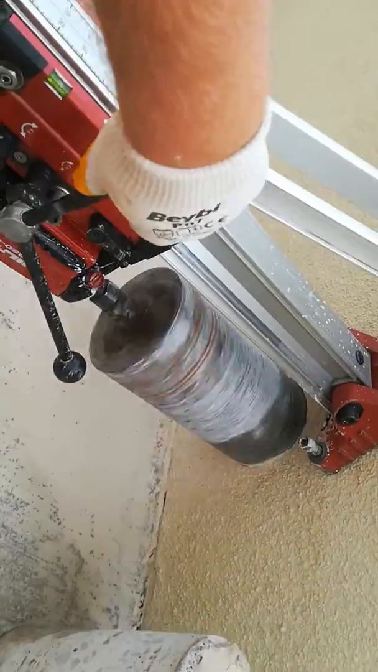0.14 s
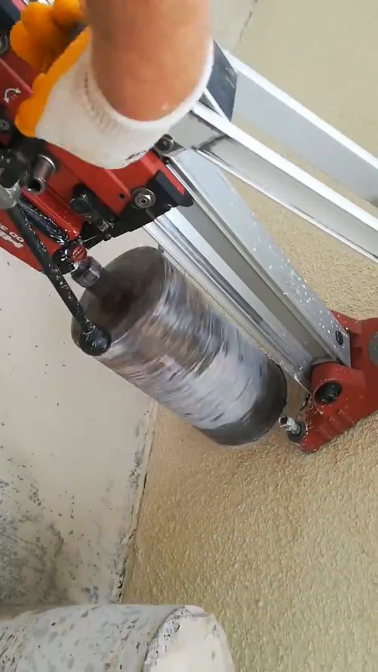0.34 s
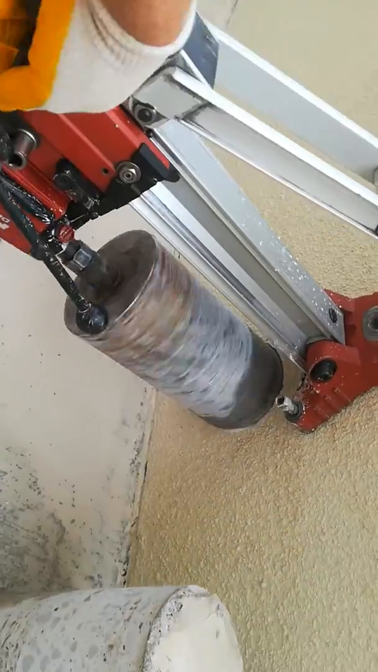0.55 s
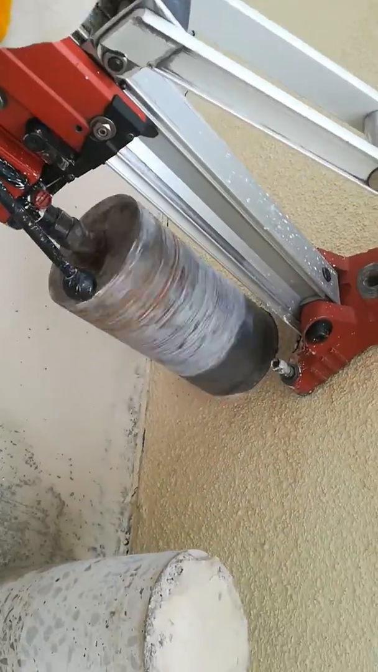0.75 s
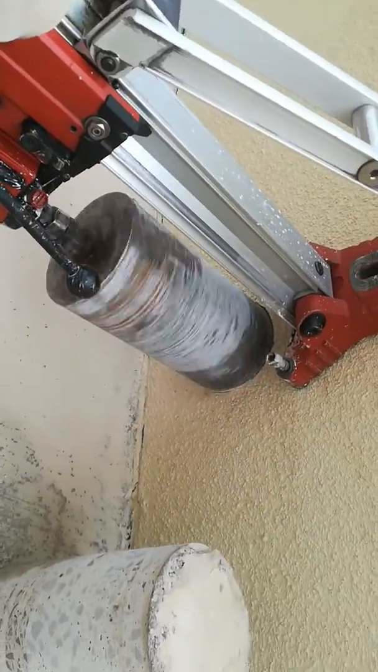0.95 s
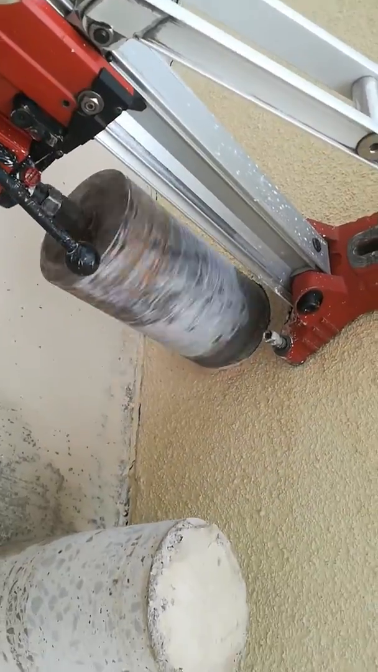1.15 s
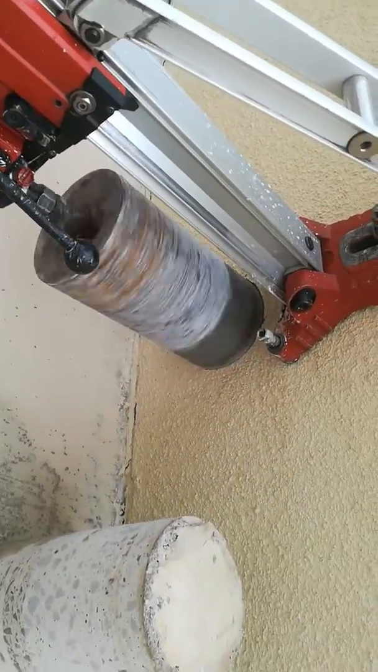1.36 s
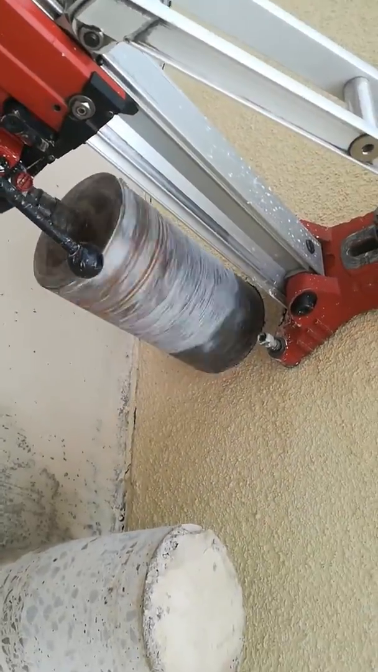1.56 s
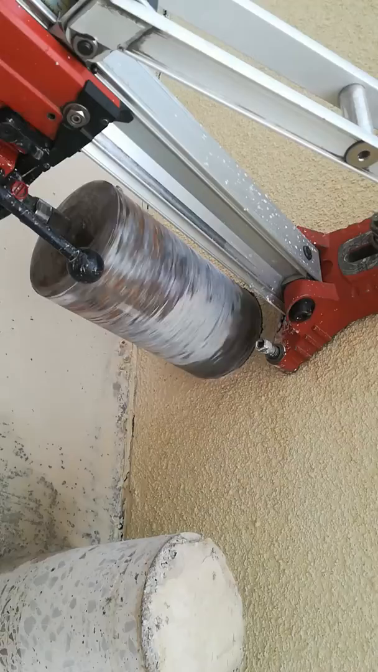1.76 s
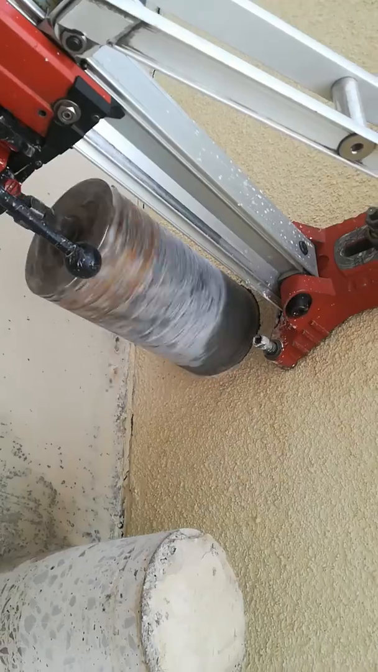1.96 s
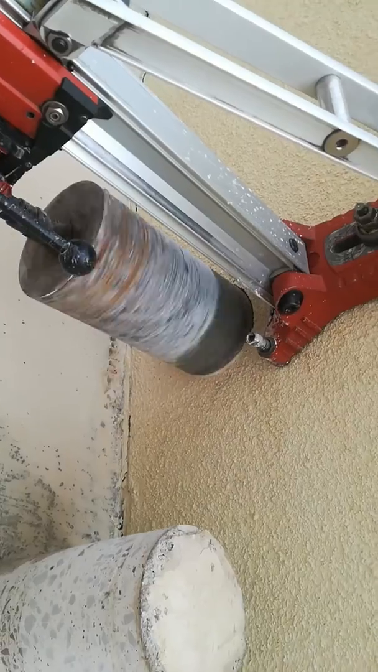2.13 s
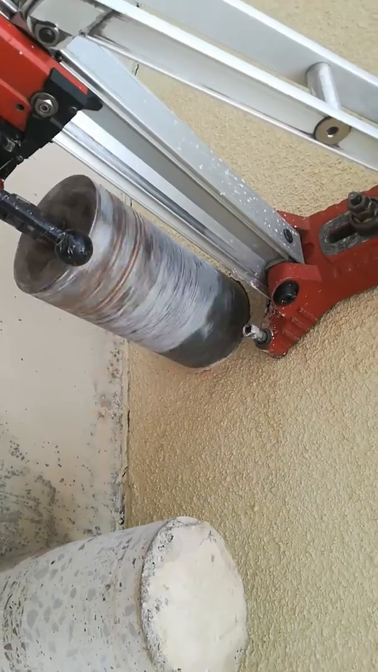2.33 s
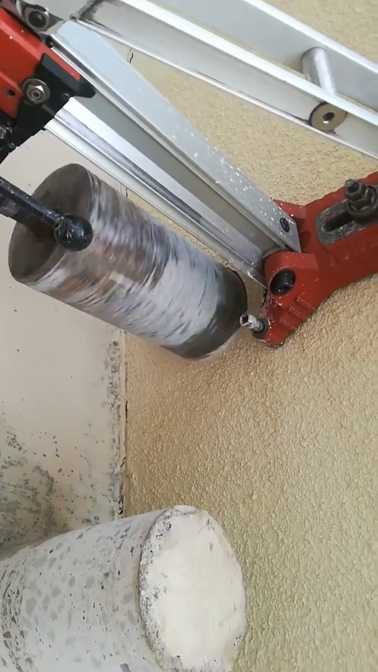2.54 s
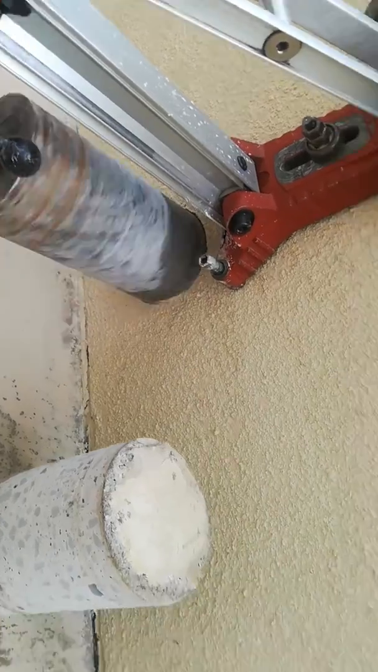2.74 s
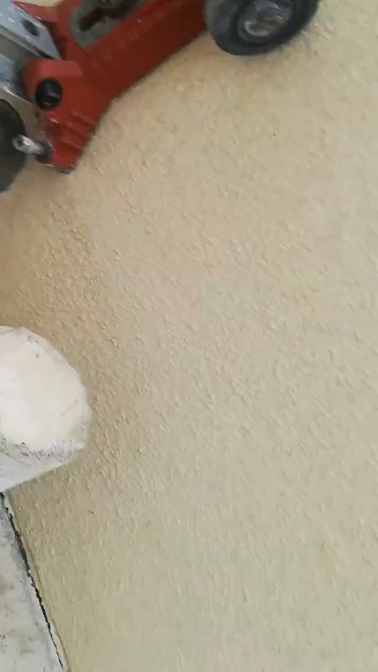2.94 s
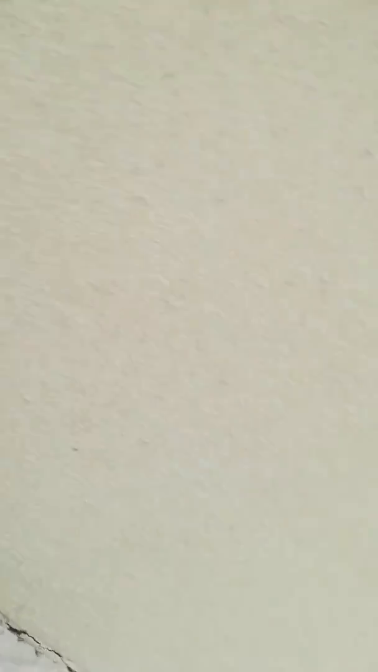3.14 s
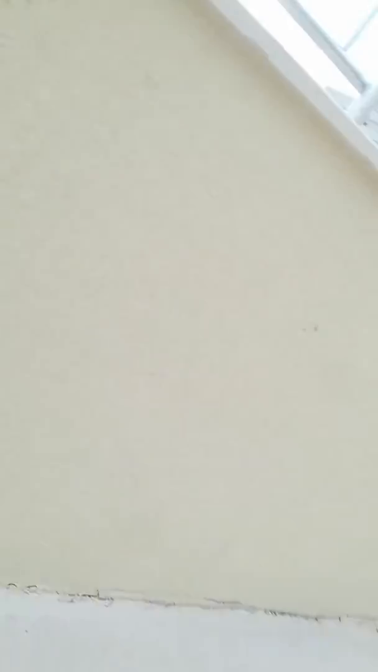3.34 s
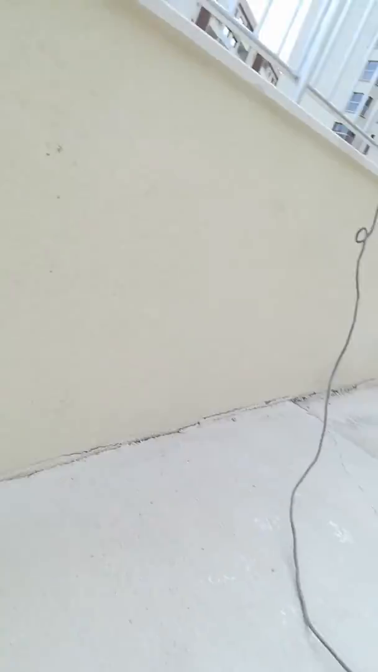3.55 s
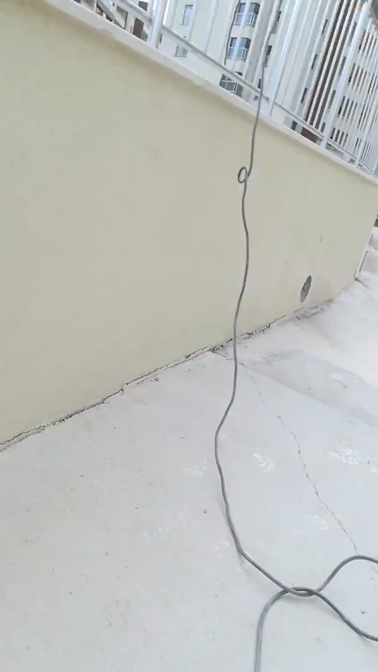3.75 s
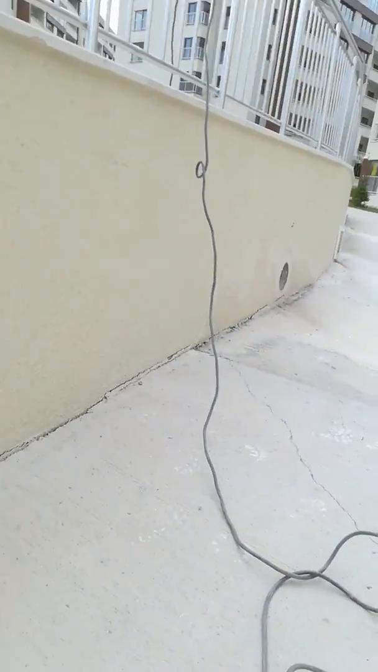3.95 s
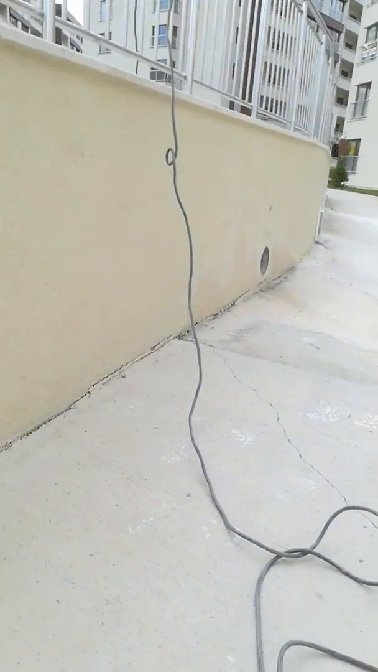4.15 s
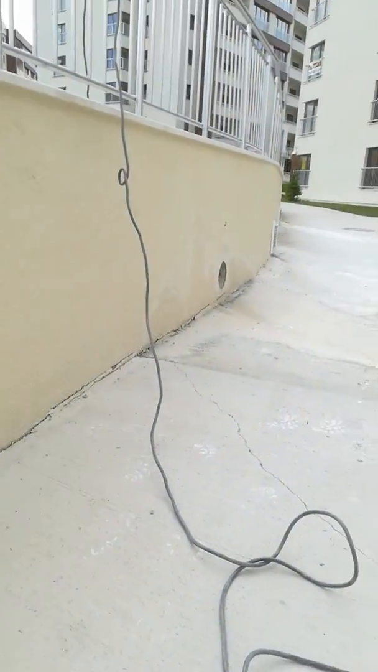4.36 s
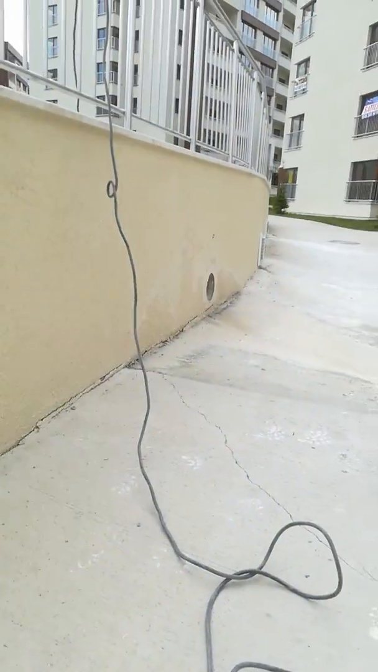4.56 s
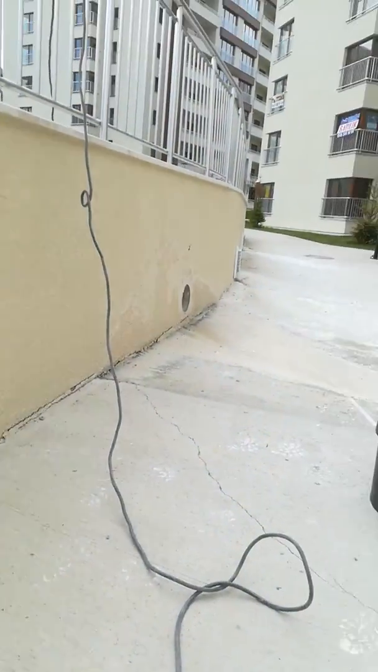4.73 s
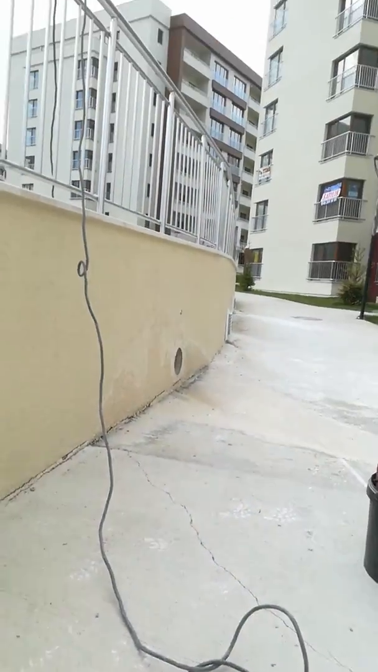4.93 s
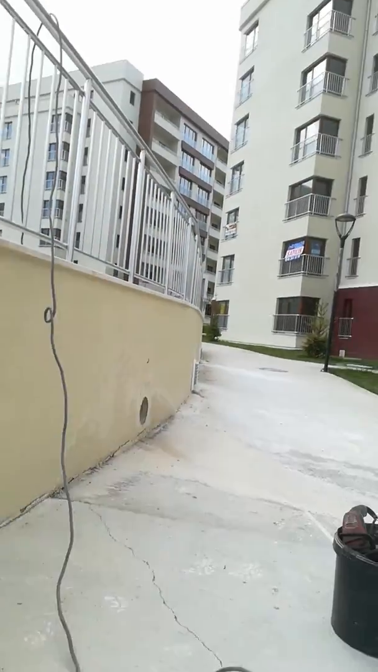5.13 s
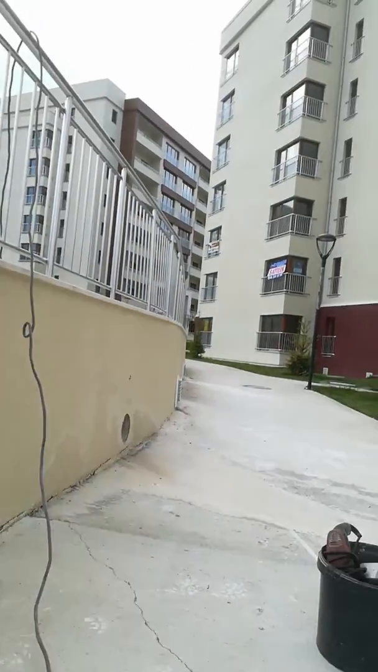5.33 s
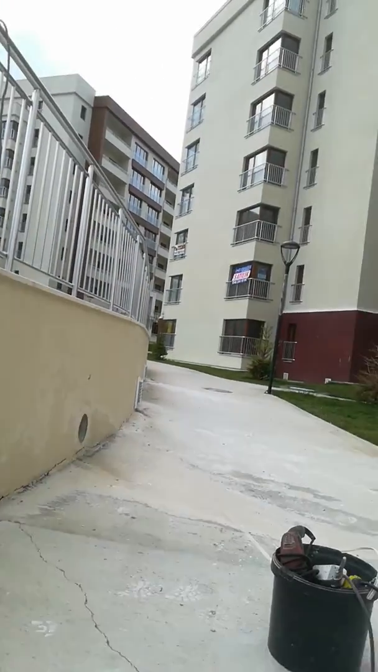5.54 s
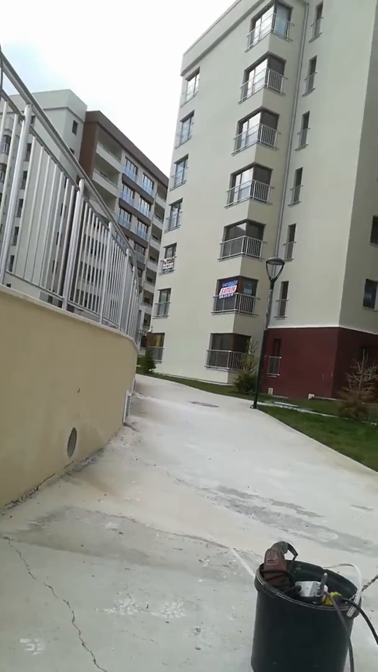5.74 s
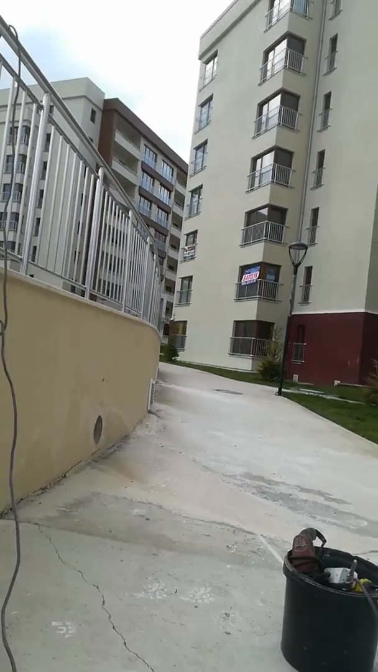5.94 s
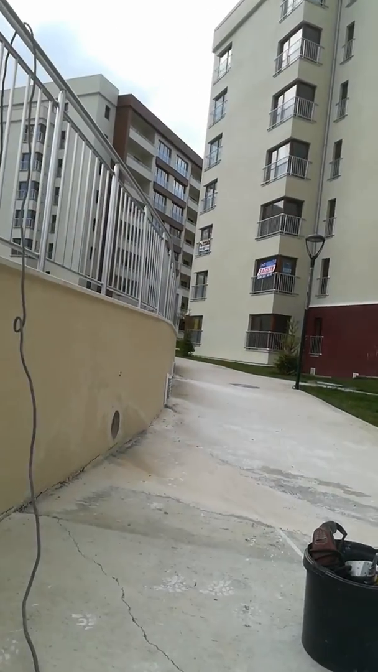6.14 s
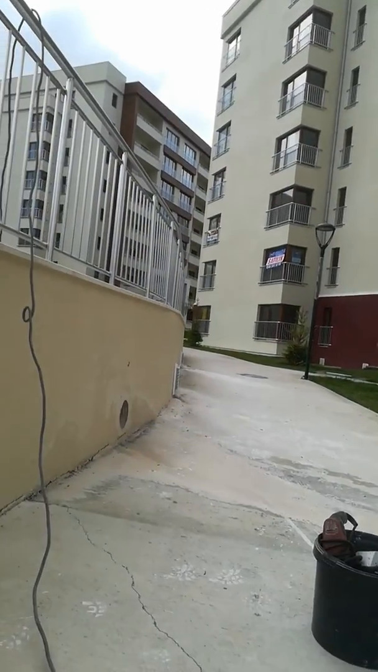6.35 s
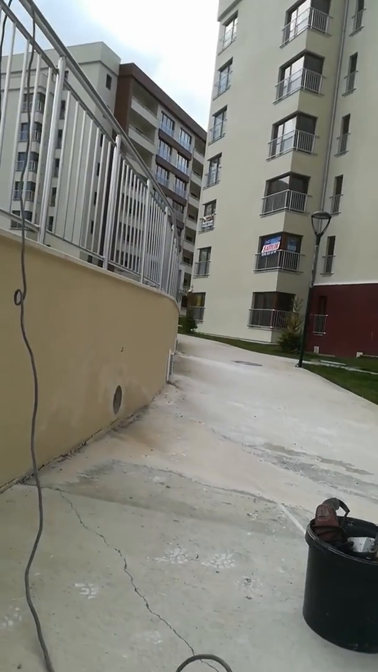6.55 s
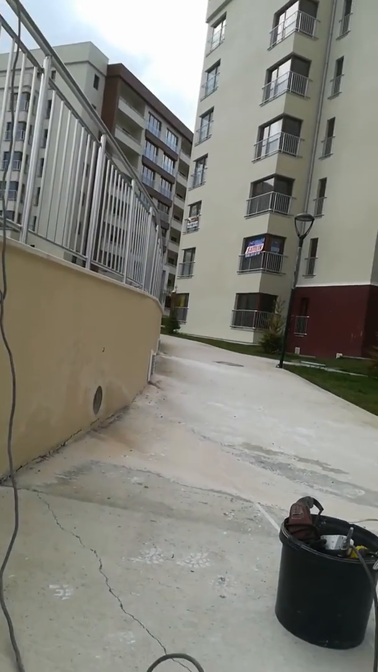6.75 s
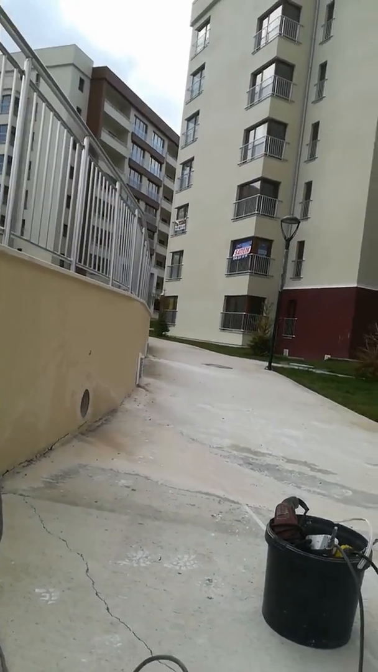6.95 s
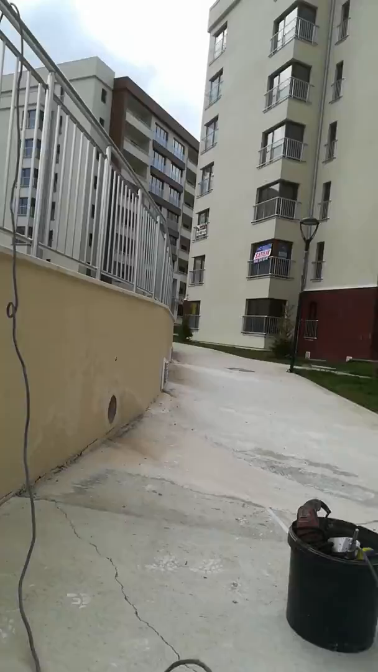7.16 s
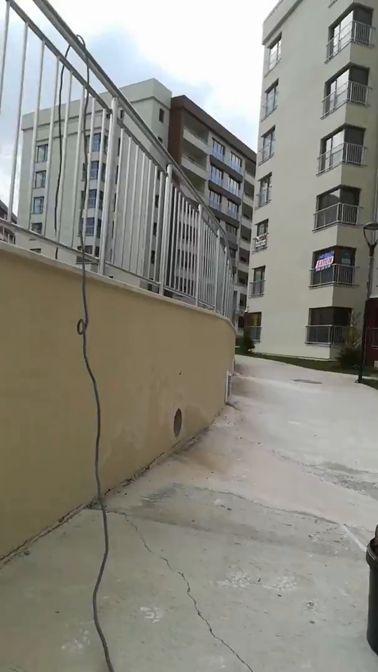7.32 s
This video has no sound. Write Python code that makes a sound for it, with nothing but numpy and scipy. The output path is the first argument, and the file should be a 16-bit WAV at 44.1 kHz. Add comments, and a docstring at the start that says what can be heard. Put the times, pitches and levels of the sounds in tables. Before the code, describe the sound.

A core drill grinds steadily into a concrete wall up close, harsh gritty rasp pulsing about six times a second over a whining motor.

```python
"""An electric core drill on a stand cuts into a concrete wall outdoors, a little over six turns a second.
Noise that repeats with each turn is the diamond grit scraping its groove; friction at tight spots shapes its
force, and resonances of the steel barrel colour it. The motor is a set of sine orders that sag with the load.
Thumps, squeaks, shudder, hum, knocks and gusts lie around it. Two microphones start close, then turn away."""
import sys
import numpy as np
from scipy import signal
from scipy.fft import rfft, irfft, next_fast_len
from scipy.io import wavfile
from scipy.ndimage import map_coordinates

SR = 44100
rng = np.random.default_rng(int(sys.argv[2]) if len(sys.argv) > 2 else 0)


def store_wav(level_fs):
    """Save 16-bit WAV to argv[1]."""
    pcm = np.round(np.clip(np.atleast_2d(level_fs), -1, 1) * 32767)
    wavfile.write(sys.argv[1], SR, pcm.T.astype(np.int16))


N = 330309
TIME = np.arange(N) / SR
SIZE = next_fast_len(N)
HZ = np.fft.rfftfreq(SIZE, 1 / SR)

PINION_TEETH = 7  # the whine is this order of the motor shaft
TURN_AWAY_S, TURN_FADE_S = 3.28, .13  # the microphones swing away from the rig once
AIM_AT_REST = 0.23  # share by which the ports point at the bit before the swing

# resonances of the barrel and stand: (frequency [Hz], width [Hz], lift beside the rig left [dB], right [dB],
# lift turned away left [dB], right [dB])
BARREL_RINGS = [(814, 40, 0.5, 3.5, 7, 9.5), (980, 42, 2.5, 3, -2, -2), (1573, 105, 8, 6, 3, 2.5),
                (1638, 65, 1.5, 10, 4, 3), (2166, 110, 10, 9.5, 7, 3), (2334, 35, 8.5, 6, 7, -2),
                (2730, 110, 1.5, 5.5, 4.5, 6), (3554, 135, 1.5, 1.5, 4.5, 8.5), (3820, 31, 6.5, 2.5, 3, 6),
                (4300, 50, -2.5, -2, 3, 6)]
# coherence of the microphone pair: (frequency [Hz], likeness [0-1], left lead beside the rig [rad],
# left lead turned away [rad])
PORT_PAIR = [(80, 0.97, 0.23, 10), (290, 1, 0.94, 0.5), (560, 0.3, 2.2, 1.5), (637, 0.95, 0.012, -4.5),
             (960, 0.48, 0.12, 0.5), (1690, 0.86, 1.1, -0.5), (2580, 0.34, 0.34, -3),
             (2810, 0.4, 0.077, -2.5), (3850, 0.42, 0.29, 2.5), (4760, 0.029, 2.8, 1.5)]


def amp(db):
    """Logarithmic level: decibels to amplitude gain."""
    return 10 ** (np.asarray(db) / 20)


def unit(x):
    """Power normalisation to rms 1."""
    return x / np.sqrt(np.mean(x ** 2) + 1e-20)


def spectra(rows):
    """Spectral envelopes: the columns of a table interpolated along log frequency."""
    hz, *columns = np.transpose(rows)
    return np.array([np.interp(np.log(HZ + 1), np.log(hz), column) for column in columns])


def wave(spectrum):
    """Fourier synthesis: from a spectrum back to sound."""
    return irfft(spectrum, SIZE)[..., :N]


def wander(rate_hz):
    """Low-pass random process of rms 1 that changes up to about the given rate."""
    noise = rfft(rng.standard_normal(SIZE))
    return unit(wave(noise * np.exp(-(HZ / rate_hz) ** 2)))


def band(hz, width_hz):
    """Band-pass noise of rms 1 around one frequency."""
    noise = rfft(rng.standard_normal(SIZE))
    return unit(wave(noise * np.exp(-((HZ - hz) / width_hz) ** 2)))


def swell(at, rise, fall):
    """Two-sided Gaussian envelope that reaches 1 at the given time."""
    return np.exp(-((TIME - at) / np.where(TIME < at, rise, fall)) ** 2)


def swells(rows):
    """Superposed Gaussian humps of level, in dB."""
    return sum(db * swell(at, rise, fall) for at, rise, fall, db in rows)


def step(at, fade):
    """Sigmoid transition from 0 to 1 around the given time."""
    return .5 + .5 * np.tanh((TIME - at) / (2 * fade))


def curve(rows):
    """Piecewise linear course in time."""
    return np.interp(TIME, *np.transpose(rows))


def passing(turns, place, width):
    """Periodic angular window: 1 each time the bit passes one spot of the bore."""
    offset = (turns - place + .5) % 1 - .5
    return np.exp(-(offset / width) ** 2)


def microphone_aim():
    """Directivity weights 0-1: ports turned away, aimed at the bit, edge-on and shaded."""
    away = step(TURN_AWAY_S, TURN_FADE_S)
    # early in the swing the ports point at the bit; late in it they pass it edge-on
    aimed = AIM_AT_REST * (1 - away) + (1 - AIM_AT_REST) * swell(at=3.04, rise=0.39, fall=0.19)
    edge_on = swell(at=3.27, rise=0.39, fall=0.6)
    # an arm shades the ports at first; the rig keeps a share of that shade
    rig_shade = 0.13
    shaded = 1 - (1 - rig_shade) * step(at=0.46, fade=0.094)
    return np.clip([away, aimed, edge_on, shaded], 0, 1)


def lee(hz, away, shade_db=-12, edge_hz=400):
    """Acoustic shadow: turned away, the right port loses up to shade_db of a tone above the edge."""
    right_only = np.array([[0], [1]])
    return amp(right_only * away * shade_db / (1 + (edge_hz / hz) ** 6))


def surface(turns, memory, size, count):
    """Periodic roughness with autoregressive wear: met again on each turn, slowly given a new shape."""
    fresh = rng.standard_normal((2, count, size))  # (port, turn, point along the turn)
    innovation = np.sqrt(1 - memory ** 2)
    worn = signal.lfilter([innovation], [1, -memory], fresh[:, 1:], axis=1, zi=memory * fresh[:, :1])[0]
    return np.array([np.interp(turns * size, np.arange(side.size), side.ravel()) for side in worn])


def grit(grain_db=.8, clump_db=.35, grain_hz=900, clump_hz=70):
    """Brittle fracture as amplitude modulation: chips break out in tiny bursts and longer clumps."""
    return unit(amp(grain_db * wander(grain_hz) + clump_db * wander(clump_hz)))


def flecks(count=3600, low_hz=1500, high_hz=6000, ring_s=.003, spread_db=3.5):
    """Impulse excitation: hard grains snap off, each ringing the steel for a moment at one of the ports."""
    t = np.arange(0, 5 * ring_s, 1 / SR)
    out = np.zeros((2, N))
    for when, pitch, size, side in rng.random((count, 4)):
        hz = low_hz * (high_hz / low_hz) ** pitch
        ring = np.sin(2 * np.pi * hz * t) * np.exp(-t / ring_s)
        start = int(when * (N - len(t)))
        out[int(2 * side), start:start + len(t)] += ring * amp(-spread_db * np.log(size + .04))
    return unit(out)


def rasping(pitch_hz, gear_share=.3, flecks_db=-12, motor_turns_per_gear_turn=6):
    """Random chips joined by quasi-periodic gear rattle, whose close lines waver with the motor."""
    gear_turns = np.cumsum(pitch_hz) / SR / PINION_TEETH / motor_turns_per_gear_turn
    teeth = unit(surface(gear_turns, memory=.95, size=1000, count=345))
    chips = np.sqrt(1 - gear_share ** 2) * rng.standard_normal((2, N)) + gear_share * teeth
    return chips * grit() + amp(flecks_db) * flecks()


def scraping(turns, chips, groove_share=.86, repeat_hz=5000):
    """Roughness excitation: the groove's bumps recur on every turn, less so towards the finest chips."""
    groove = surface(turns, memory=.84, size=6900, count=52) * grit()
    repeats = groove_share / np.sqrt(1 + (HZ / repeat_hz) ** 4)
    return wave(repeats * rfft(groove, SIZE) + np.sqrt(1 - repeats ** 2) * rfft(chips, SIZE))


def cutting(contact, force, rasp_hz=1900):
    """Force-dependent excitation: the high rasp follows the force, the ringing below it its square root."""
    fine = 1 - 1 / (1 + (HZ / rasp_hz) ** 8)
    rasp = fine * rfft(contact * force, SIZE)
    ringing = (1 - fine) * rfft(contact * np.sqrt(force), SIZE)
    return (rasp + ringing) * np.sqrt(SR / 2)  # 0 dB per Hz


def ports(drive, likeness, lead):
    """Partial coherence: two unrelated spectra become a partly alike, phase-shifted pair."""
    same = np.clip(likeness, 0, 1)
    right = same * drive[0] + np.sqrt(1 - same ** 2) * drive[1]
    return np.array([drive[0], right * np.exp(-1j * lead)])


def barrel(lifts_db, low_hz=340):
    """Modal resonance: gain of the steel barrel's rings at both ports; it radiates little bass."""
    hz, width = np.transpose(BARREL_RINGS)[:2, :, None]
    peaks = 1 / (1 + (2 * (HZ - hz) / width) ** 2)
    power = abs(1 + (amp(lifts_db) ** 2 - 1) @ peaks)
    return np.sqrt(power / (1 + (low_hz / (HZ + 1)) ** 8))


def tinted(spectrum, colour, share):
    """Linear filtering: what a colour adds to the sound as its share rises from 0 to 1."""
    return share * wave(spectrum * (amp(spectra(colour)) - 1))


def swung(pair, lead_ms=0.23):
    """Interaural-type delay: the right port gains a small lead as the swing starts."""
    lead = lead_ms * SR / 1000 * step(at=2.84, fade=0.037)
    right = map_coordinates(pair[1], [np.arange(N) + lead], order=3, mode="nearest")
    return np.array([pair[0], right])


def grinding(contact, load_db):
    """Source-filter radiation: the cut rings the barrel, coloured by the way the microphones point."""
    # grinding before the barrel's rings, beside the rig and turned away:
    # (frequency [Hz], left [dB per Hz], right [dB per Hz])
    near_density = [(510, -71.5, -71.5), (758, -68, -70), (846, -57, -59), (885, -56, -53), (999, -60, -62),
                    (1047, -58, -67), (1093, -66.5, -67), (1450, -59, -56), (2050, -60.5, -57),
                    (2530, -53.5, -60), (2780, -53.5, -56), (3770, -48.5, -52.5), (4870, -50, -55),
                    (5830, -58.5, -61.5), (7300, -63, -57.5), (9380, -69, -64.5), (10720, -78.5, -81.5),
                    (15500, -86, -87.5)]
    away_density = [(345, -74, -84), (418, -68, -77.5), (630, -62.5, -76.5), (764, -67.5, -76),
                    (904, -66, -72.5), (1090, -60.5, -63), (1295, -70, -71), (2030, -58.5, -66),
                    (2440, -58, -77), (2680, -53.5, -69), (2956, -48, -65), (3440, -56.5, -67.5),
                    (4120, -50.5, -60), (5960, -56.5, -66), (7720, -65, -75.5), (9280, -68.5, -75),
                    (11000, -76, -85.5), (15500, -87, -90.5)]
    # colour of the ports aimed at the bit, edge-on, shaded, and sweeping past the motor with extra hiss:
    # (frequency [Hz], left [dB], right [dB])
    aimed_colour = [(400, 5, 0), (600, 5.5, 0), (720, 5.5, -6), (870, 4.5, -1), (1410, -6, 1),
                    (1630, -6, -4.5), (1870, -8, -5.5), (2200, -8, -1), (2820, 6.5, -6), (3660, -2, -13),
                    (4270, -0.5, -4), (5450, 3, 11.5), (6530, 3.5, 9), (8000, 2, -3), (9600, 1, -1.5),
                    (11200, 6, 14.5), (15500, 4, 9)]
    edge_colour = [(600, -1.5, -3), (1040, -1, 1), (1460, 15.5, 1), (1770, -12, 9), (2190, 3, 6),
                   (2920, 0, -2), (3800, 2, 7.5), (4540, 5, 2), (6040, -3.5, -7), (7000, 2.5, 3),
                   (8500, 2, 5), (10400, -8, -1), (15000, 2, 8)]
    shaded_colour = [(280, 6, 8), (480, -11, -9), (700, -22, 1), (945, 4, -3), (1660, -6, 3), (2000, -3, 3),
                     (2780, -4, 2.5), (3200, -18, 5), (3500, -9, 5.5), (3880, -1, 3), (5200, -5, -3.5),
                     (5600, -8, 6), (6050, -6, -4.5), (9100, -2, -1), (15000, -12, -1)]
    hissy_colour = [(500, 6, -2), (930, -2, 0), (1350, -4, 3), (1600, 0, -1), (2480, 6, 0), (4000, 2, 1),
                    (6260, 1.5, 5), (8100, 10.5, 9.5), (10000, 2, -2), (13000, 9, 13)]
    away, aimed, edge_on, shaded = microphone_aim()
    likeness, lead_near, lead_away = spectra(PORT_PAIR)
    lifts_near, lifts_away = np.split(np.transpose(BARREL_RINGS)[2:], 2)

    near = ports(cutting(contact, amp(load_db)), likeness, lead_near)
    near = near * barrel(lifts_near) * amp(spectra(near_density))
    close = swung(wave(near) + tinted(near, aimed_colour, aimed) + tinted(near, shaded_colour, shaded))
    close = close + tinted(near, hissy_colour, swell(at=3.33, rise=0.15, fall=.09))

    far = ports(cutting(contact[::-1], amp(load_db)), likeness, lead_away)  # the ports trade places
    far = far * barrel(lifts_away) * amp(spectra(away_density))
    turned = wave(far) + tinted(far, edge_colour, edge_on)
    return np.cos(away * np.pi / 2) * close + np.sin(away * np.pi / 2) * turned


def chatter(turns, load_db, flare_db=4.7):
    """Friction-excited modes: each ring flares at its own places in the turn, harder under load."""
    # rings as the barrel rubs the bore, before the losses by aim below:
    # (frequency [Hz], width [Hz], level beside the rig [dB], level turned away [dB])
    rubbed_rings = [(2236, 59, -28.5, -45), (2410, 48, -45, -48), (2870, 60, -39, -31),
                    (3150, 66, -34, -39), (3734, 140, -30, -29), (4033, 55, -33, -29.5),
                    (4620, 90, -43, -45)]
    away, aimed, _, shaded = microphone_aim()
    out = np.zeros((2, N))
    for hz, width_hz, near_db, away_db in rubbed_rings:
        roughness = surface(turns, memory=.85, size=11, count=52)[0]
        flare = unit(amp(flare_db * roughness + load_db))
        level = amp(near_db + (away_db - near_db) * away - 3.1 * aimed)
        out += level * flare * np.array([band(hz, width_hz), band(hz, width_hz)])
    return out * amp([-7 * shaded, -4 - 11 * away])  # shade dulls the left port, turning away the right


def thumps(turns, uneven_db=2.0, smear=1.0, shade_db=-5, aimed_db=-8):
    """Periodic impact: short rings of the barrel, once a turn each, never quite equally strong."""
    # the same spots of every turn, levels before shade and aim: (place [share of the turn],
    # half width [turns], frequency [Hz], level beside the rig [dB], level turned away [dB])
    struck_spots = [(0.205, 0.043, 235, -38, -54), (0.12, 0.023, 250, -45, -47),
                    (0.54, 0.04, 235, -52, -43.5), (0.95, 0.027, 200, -58, -48),
                    (0.46, 0.14, 115, -56.5, -48.5), (0.018, 0.032, 400, -46, -51),
                    (0.453, 0.045, 595, -44, -38), (0.057, 0.048, 800, -57, -45),
                    (0.62, 0.044, 790, -37, -58), (0.34, .04, 940, -39, -50), (0.64, 0.039, 1300, -50, -40),
                    (0.55, 0.029, 2200, -38, -38), (.39, 0.032, 2350, -31, -46),
                    (.41, 0.021, 2750, -40, -32), (0.67, .05, 3650, -30, -40)]
    away, aimed, _, shaded = microphone_aim()
    out = 0
    for place, width, hz, near_db, away_db in struck_spots:
        # as the ports swing towards the bit, the high pings weaken
        off_axis_db = aimed_db * (aimed - AIM_AT_REST) * (hz > 2000) * (1 - away)
        level = amp(near_db + (away_db - near_db) * away + off_axis_db) * unit(amp(uneven_db * wander(1.8)))
        tone = np.sin(2 * np.pi * hz * TIME + smear * wander(35))
        out = out + lee(hz, away) * level * passing(turns, place, width) * tone
    return np.sqrt(2) * out * amp(shade_db * shaded)


def squeak(turns, hz=3230, place=0.018, length=0.058, rough=0.7, right_db=-6):
    """Frictional tone: a short rubbed note with unsteady phase at one spot of every turn."""
    # spells of squeaking: (time [s], build-up [s], release [s], level in the left port [dB])
    squeak_spells = [(1.65, 0.54, 0.94, -15.5), (3.25, 0.2, 0.092, -22)]
    tone = np.sqrt(2) * np.sin(2 * np.pi * hz * TIME + rough * wander(80))
    level = sum(amp(db) * swell(at, rise, fall) for at, rise, fall, db in squeak_spells)
    return tone * passing(turns, place, length) * level * amp([[0], [right_db]])


def motor(pitch_hz, jitter_hz=7, flutter_db=3.5, lead=1.67, away_db=-4):
    """Harmonic orders of one shaft: they sag together, and each flutters on its own."""
    # weaker orders: (multiple of the shaft speed, level beside the rig [dB])
    weak_orders = [(1, -54), (3, -50.5), (4, -46), (9, -35), (12, -38), (14, -50)]
    # the two loud orders: (multiple, beside the rig left [dB], right [dB], turned away left [dB], right [dB],
    # change when shaded left [dB], right [dB], change when aimed [dB])
    loud_orders = [(7, -23.5, -30.5, -38.5, -44.5, -9, 2.5, -9.5), (6, -42, -31.5, -34, -46, 8.5, 7.5, 4)]
    # the pinion whine swells in the left port: (time [s], build-up [s], release [s], rise [dB])
    whine_swells = [(4.05, 0.72, 0.31, 7.5), (7.1, 0.55, .9, 7.5)]
    away, aimed, _, shaded = microphone_aim()
    shaft = 2 * np.pi * np.cumsum(pitch_hz + jitter_hz * wander(61.0)) / SR / PINION_TEETH
    shaft = shaft - np.array([[0], [lead]]) / PINION_TEETH  # the sound reaches the right port later
    lines = []
    for order, db in weak_orders:
        gain = amp(db + away_db * away) * lee(order * pitch_hz[0] / PINION_TEETH, away)
        lines.append((round(order), gain))
    for order, *pairs, aimed_db in loud_orders:
        near_db, far_db, shade_db = np.reshape(pairs, (-1, 2, 1))
        db = near_db * (1 - away) + far_db * away + shade_db * shaded + aimed_db * aimed
        if round(order) == PINION_TEETH:
            db[0] += swells(whine_swells)
        lines.append((round(order), amp(db)))
    tones = sum(gain * unit(amp(flutter_db * wander(54))) * np.sin(order * shaft) for order, gain in lines)
    return np.sqrt(2) * tones


def shudder(contact, swing_hz, jolt_db_per_hz=0.24):
    """Structure-borne vibration: stand and wall shake hardest where the bit drags the motor down."""
    # low-frequency shaking, before its course in time: (frequency [Hz], density [dB per Hz])
    rumble_density = [(15, -85), (45, -80.5), (70, -78), (105, -71.5), (180, -72), (220, -67.5),
                      (310, -74.5), (380, -84), (700, -100)]
    # course of the shaking: (time [s], level change [dB])
    shaking_course = [(0, 2.5), (2, -0.5), (3.6, .5), (4.8, -.5), (7.49, -1)]
    likeness, lead, _ = spectra(PORT_PAIR)
    drive = cutting(contact, unit(amp(-jolt_db_per_hz * swing_hz)))
    return wave(ports(drive, likeness, lead) * amp(spectra(rumble_density))) * amp(curve(shaking_course))


def hum(waver=.55, throb_db=3.2):
    """Phase and amplitude modulation: sustained low tones of the motor's supply and casing waver and throb."""
    # levels in the left port: (frequency [Hz], beside the rig [dB], turned away [dB])
    hum_tones = [(80.5, -70, -61.5), (113.5, -58, -62), (300, -46.5, -49), (580, -63, -51), (889, -47, -57)]
    away = microphone_aim()[0]
    out = 0
    for hz, near_db, far_db in hum_tones:
        level = amp(near_db + (far_db - near_db) * away) * unit(amp(throb_db * wander(25)))
        out = out + lee(hz, away) * level * np.sin(2 * np.pi * hz * TIME + waver * wander(16))
    return np.sqrt(2) * out


def knocks(right_db=-3):
    """Transient tone bursts: brief dull knocks on the rig and the hand-held camera under the drilling."""
    # single knocks: (time [s], half length [s], frequency [Hz], level in the left port [dB])
    single_knocks = [(.29, .02, 85, -43), (.52, .02, 90, -51), (.795, .016, 131, -41),
                     (4.454, .004, 1270, -29), (4.475, 0.0081, 830, -30), (4.492, 0.0083, 1160, -32)]
    rings = 0
    for at, length, hz, db in single_knocks:
        rings = rings + amp(db) * swell(at, length, length) * np.sin(2 * np.pi * hz * (TIME - at))
    return np.sqrt(2) * rings * amp([[0], [right_db]])


def buffet(hz=55, width_hz=45, lumpy_db=3, calm_db=-65.5):
    """Flow noise: air moving past the hand-held camera makes a faint, lumpy rumble."""
    # soft gusts: (time [s], build-up [s], release [s], rise over the calm [dB])
    soft_gusts = [(.4, .5, .35, 15), (3.7, .8, 1.2, 3), (6.45, .35, .9, 9)]
    return band(hz, width_hz) * unit(amp(lumpy_db * wander(7))) * amp(calm_db + swells(soft_gusts))


def scene():
    """Coupled rotation: the bit's angle sets the friction, and the friction makes the motor sag."""
    # motor speed as its pinion whine, before the sag: (time [s], pitch [Hz])
    whine_course = [(0, 1855), (.8, 1859), (3, 1877), (3.8, 1865), (5.7, 1885), (6.2, 1872), (7.49, 1873)]
    # pressure on the feed lever: (time [s], level [dB])
    feed_course = [(.24, -4), (.36, -1.7), (.55, 0.14), (2.4, 0.5), (3.2, -0.5), (4.3, 0.5), (7.49, 0.54)]
    # the bit slips (below 0) or bites: (time [s], build-up [s], release [s], load change [dB])
    slips_and_bites = [(.025, 0.0068, 0.0086, 6), (.066, 0.012, .003, -8), (.18, 0.014, 0.02, 3),
                       (.22, 0.014, .005, -8), (.229, .002, 0.014, 1), (.33, .01, 0.02, 3.5),
                       (.572, 0.013, .016, 0.5), (.62, .015, 0.012, -1.5), (.89, 0.059, .02, 1.3),
                       (2.905, 0.013, 0.011, 2), (3.05, .027, .027, 1.5), (3.487, .018, .018, -2),
                       (4.22, 0.021, 0.019, -2)]
    # loose or tight spots of the bore, before centring and growth:
    # (place [share of the turn], half width [turns], friction [dB])
    bore_spots = [(.03, 0.045, 1.2), (.19, 0.17, -3), (.85, 0.082, -3)]
    whine_cycles_per_turn = 293.3
    surge_growth = .15  # the surge of each turn stands out more once turned away
    sag_hz_per_db, inertia_s = 12, 0.013  # friction drags the whine down, a little late

    pitch_hz = curve(whine_course)
    turns = np.cumsum(pitch_hz) / SR / whine_cycles_per_turn
    friction_db = sum(db * passing(turns, place, width) for place, width, db in bore_spots)
    friction_db = (friction_db - friction_db.mean()) * (1 + surge_growth * step(TURN_AWAY_S, TURN_FADE_S))
    keep = np.exp(-1 / (inertia_s * SR))
    swing_hz = -sag_hz_per_db * signal.lfilter([1 - keep], [1, -keep], friction_db)
    load_db = curve(feed_course) + friction_db + swells(slips_and_bites)

    contact = scraping(turns, rasping(pitch_hz + swing_hz))
    cut = grinding(contact, load_db) + chatter(turns, load_db) + thumps(turns) + squeak(turns)
    machine = motor(pitch_hz + swing_hz) + shudder(contact, swing_hz) + hum()
    return cut + machine + knocks() + buffet()


def record(dry, ceiling=.95, cutoff_hz=15850):
    """Soft saturation and low-pass filtering: the highest peaks are rounded off and the band limited."""
    rounded = dry / (1 + (dry / ceiling) ** 8) ** (1 / 8)
    lowpass = signal.firwin(511, cutoff_hz, window=("kaiser", 9), fs=SR)
    return signal.oaconvolve(rounded, lowpass[None], "same", axes=1)


dry = scene()
out = record(dry)
store_wav(out)
```